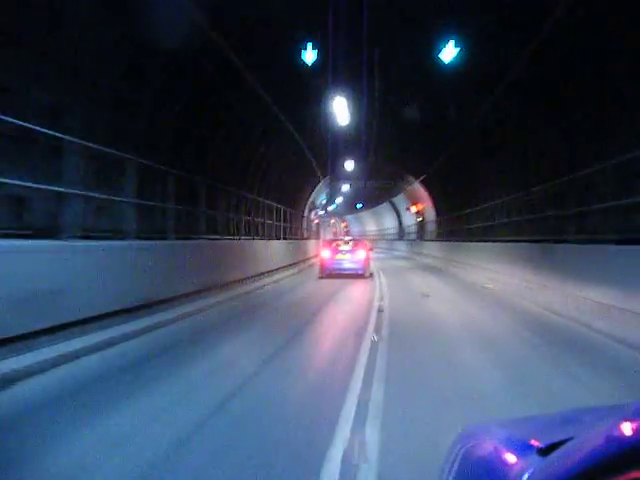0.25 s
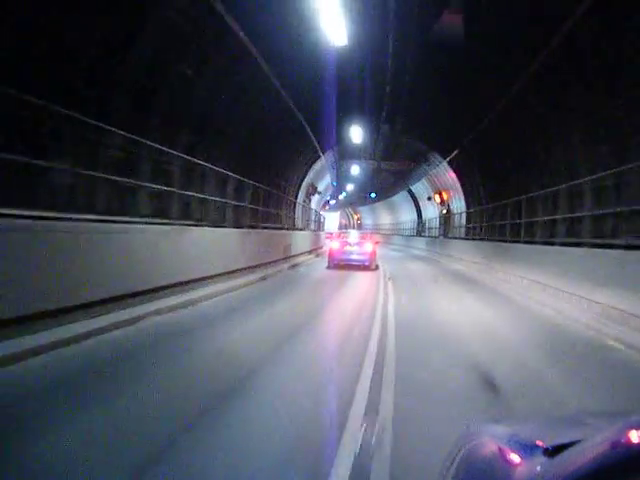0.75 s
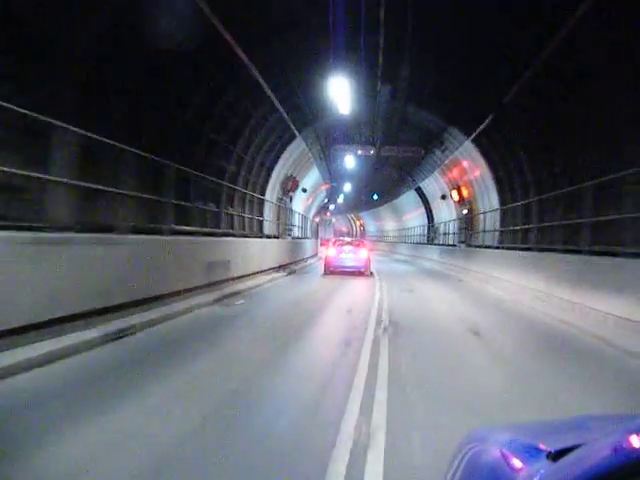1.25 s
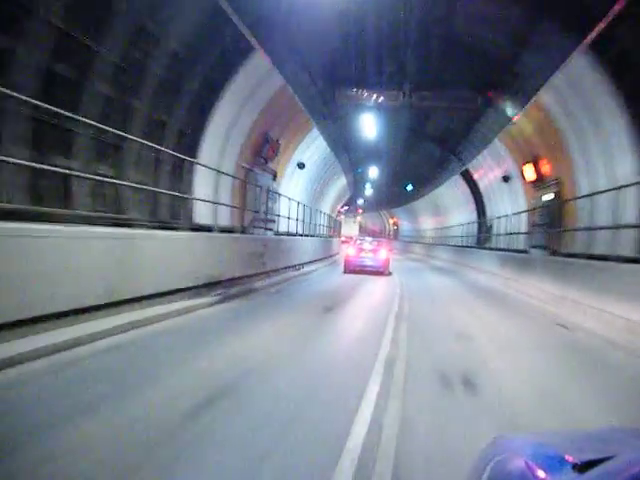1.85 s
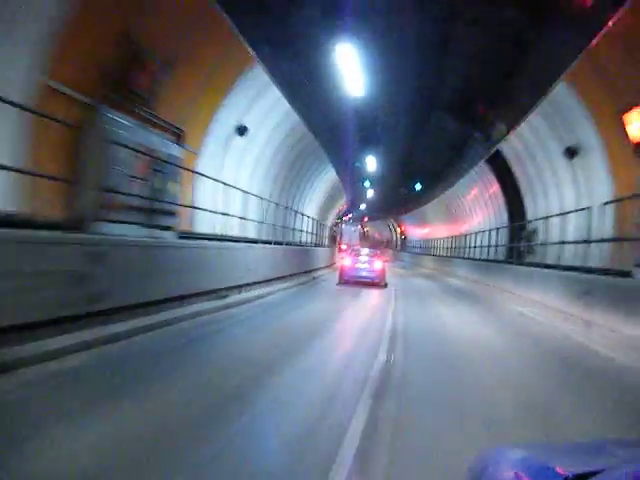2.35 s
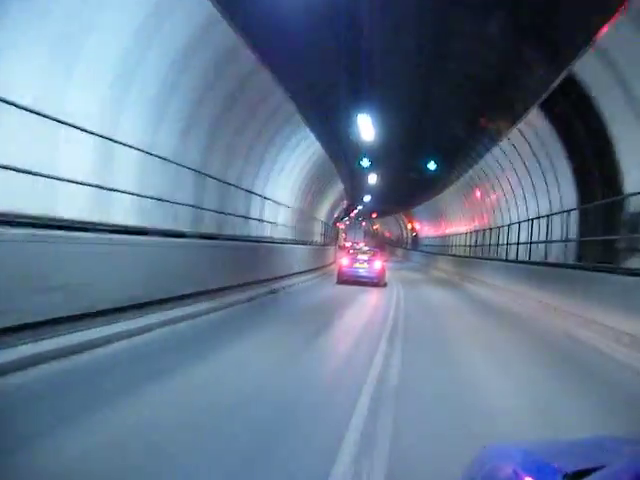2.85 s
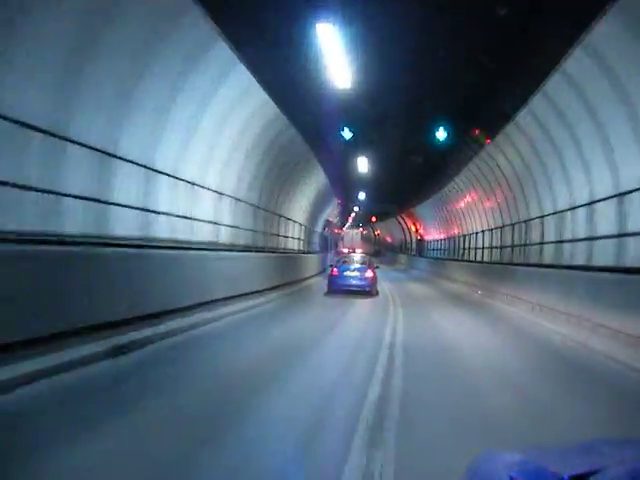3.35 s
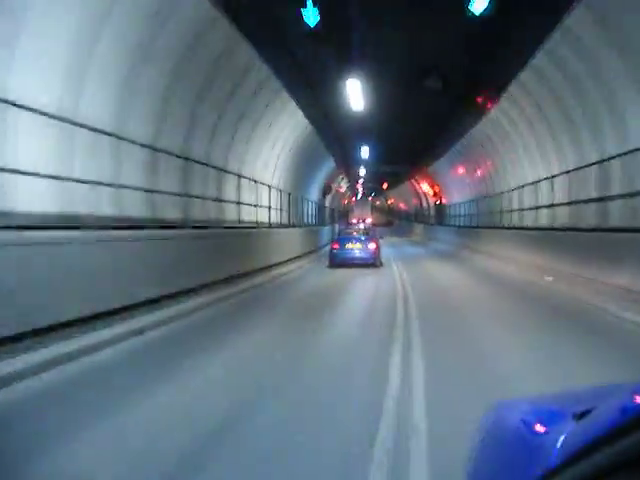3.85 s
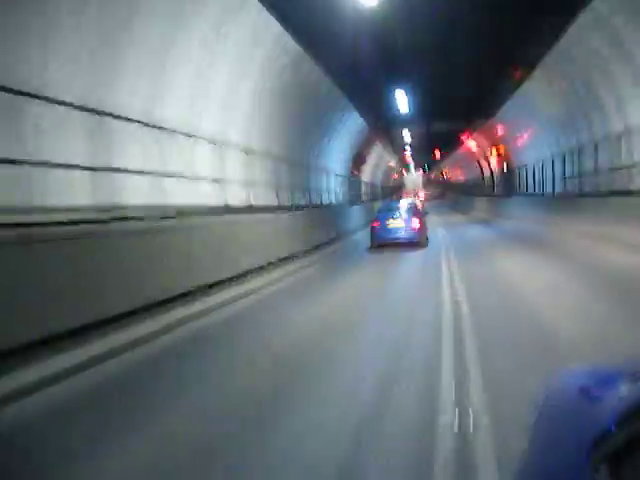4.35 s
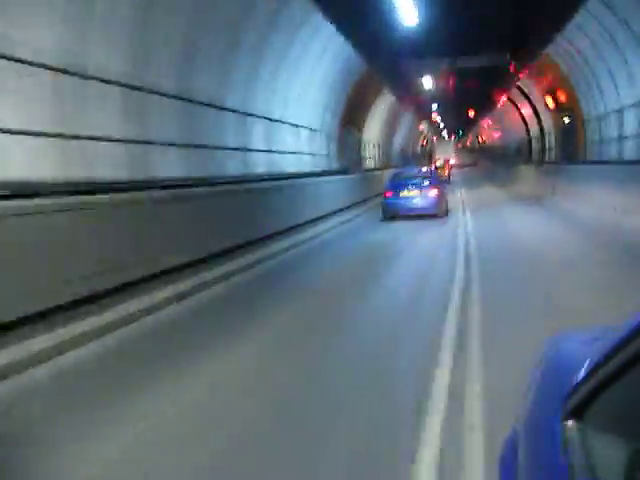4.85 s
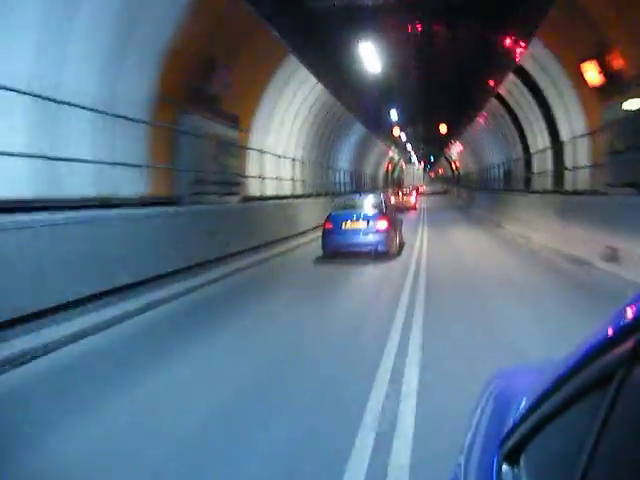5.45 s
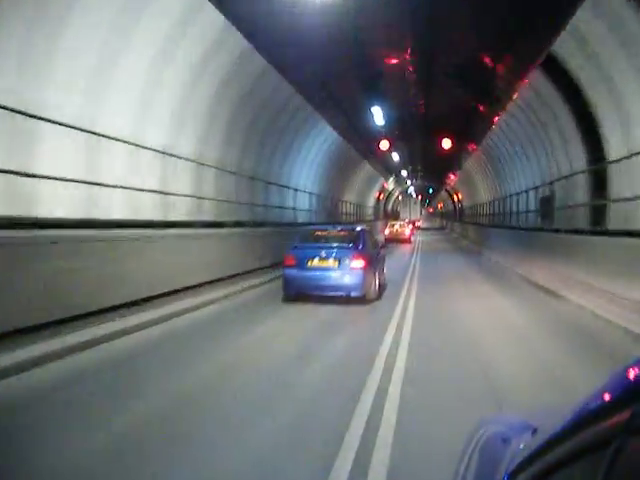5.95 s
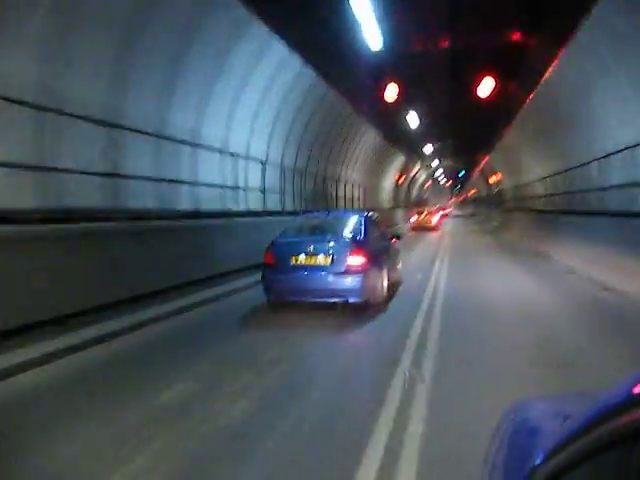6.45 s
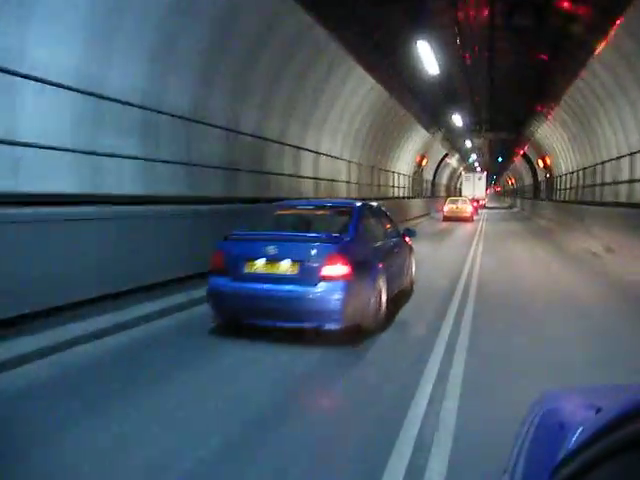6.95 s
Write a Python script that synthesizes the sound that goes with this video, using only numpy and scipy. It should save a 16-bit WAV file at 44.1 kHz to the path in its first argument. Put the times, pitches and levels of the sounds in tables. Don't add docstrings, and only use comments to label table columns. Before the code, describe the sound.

Wind thumps and crackles hard against a small microphone over the dull roar of tyres and a humming engine in a fast tunnel drive.

```python
import sys
import numpy as np
from scipy import signal
from scipy.fft import rfft, irfft, next_fast_len
from scipy.io import wavfile
from scipy.ndimage import uniform_filter1d

SR = 44100
rng = np.random.default_rng(int(sys.argv[2]) if len(sys.argv) > 2 else 0)


def magnitude_from_level(level_db):
    exponent = np.asarray(level_db, float) / 20
    return 10 ** exponent


def store_pcm(level_fs):
    pcm = np.round(np.clip(level_fs, -1, 1) * 32767).astype(np.int16)
    wavfile.write(sys.argv[1], SR, np.atleast_2d(pcm).T)


N = 318244

# (time [s], buffet level [dB], thump over buffet [dB])
WIND = [(0.0, -23.5, 11.5), (0.22, -20, 1), (0.34, -26, 9.5), (0.78, -15, 2.5), (1.41, -20, 3.5),
        (1.91, -14.5, -3.5), (2.03, -21.5, 4), (2.49, -19, -2.5), (3.13, -20, 7), (3.28, -18, -7.5),
        (3.39, -23.5, 1), (5.27, -14, 0), (5.37, -13.5, 0), (5.49, -17.5, 2), (5.71, -15, 0.5),
        (5.73, -20, 0), (7.18, -16.5, -0.5), (7.22, -27.5, 10)]
# (frequency [Hz], density [dB per Hz])
BUFFET_COLOUR = [(8, -32.5), (20, 4), (35, -2.5), (70, 0), (110, -16), (200, -31.5)]
# (frequency [Hz], density [dB per Hz])
THUMP_COLOUR = [(40, -31.5), (80, -2), (120, 2), (170, -7), (260, -11.5), (450, -23.5)]
# (time [s], crack level [dB], depth [dB])
SLAMS = [(0.196, -36, -4), (0.519, -52, -0.5), (0.8672, -42, -3), (0.8987, -46, 0.5), (1.0883, -41, -2),
         (1.1214, -44, -4.5), (1.4048, -38, -3), (1.7762, -51, -4), (2.0276, -45, -6.5), (2.396, -46, -5),
         (2.514, -46, -2.5), (2.6419, -33, -4.5), (2.754, -35, 0.5), (2.9513, -47, -4), (3.0742, -49, -3),
         (3.092, -26.5, 1), (3.3263, -38.5, -3), (3.9114, -41, -9), (4.4156, -40, -1.5), (4.5159, -40, -4),
         (4.7436, -51, -2.5), (4.7734, -37, -2.5), (4.812, -36, -3), (5.4985, -44, -6.5),
         (5.7743, -32, -3.5), (6.0126, -27, -6), (6.6135, -40, -6.5), (6.64, -41, -0.5), (6.9176, -42, -3),
         (7.108, -27.5, -2.5)]
# (time
# [s], crack level [dB])
MORE_SLAMS = [(0.0521, -47), (0.0845, -48), (0.1205, -42.5), (0.1503, -45.5), (0.2549, -46), (0.4869, -49),
              (0.5997, -47.5), (0.84, -43), (1.037, -48.5), (1.2251, -47.5), (1.6764, -48), (1.9001, -57.5),
              (1.9546, -47.5), (2.0799, -40), (2.0986, -47), (2.1677, -46), (2.1805, -48), (2.5316, -38),
              (2.837, -47.5), (2.8862, -51.5), (3.1112, -44), (3.3492, -39), (3.4394, -42.5), (3.4653, -44),
              (3.4966, -43.5), (4.2609, -42), (4.3708, -42.5), (4.677, -44), (5.9681, -44.5), (6.3062, -52)]
# (time [s], change [dB], half length [s])
GUSTS = [(0.036, 2.5, 0.022), (0.993, 4, 0.06), (1.062, -9.5, 0.013), (1.179, -13, 0.0091),
         (1.337, -5, 0.0068), (2.107, 3.5, 0.037), (2.276, 0.5, 0.036), (2.46, -5, 0.012),
         (2.516, 3.5, 0.0088), (2.887, -2.5, 0.054), (3.09, 2.5, 0.072), (4.63, 3, .1), (4.999, 7.5, .008),
         (5.028, -4, 0.01), (5.203, -4, 0.029), (5.466, -5.5, .06), (5.626, -10, 0.018),
         (5.722, -6.5, 0.022), (5.803, -6, 0.025), (5.861, 5, 0.0053), (5.93, -5.5, 0.028),
         (5.963, 6, .012), (6, -26, .01), (6.003, 16, 0.014), (6.046, -15, 0.0061), (6.128, 3.5, 0.049),
         (6.43, -4, .012), (6.491, 3, 0.015), (6.499, -12, 0.0068), (6.889, -5, 0.036)]
# (frequency [Hz], density [dB per Hz])
WHIRL_COLOUR = [(300, -11.5), (700, -1.5), (1200, 4), (2000, -1.5), (3000, -8), (4200, -14), (5400, -19.5),
                (5950, -37.5)]
# (time [s], roar level [dB])
TUNNEL = [(0, -18.5), (.5, -18.5), (.8, -20.5), (1.3, -20), (2.0, -20), (2.5, -18), (3.2, -20.5),
          (3.6, -18.5), (4.75, -19.5), (4.95, -22.5), (5.6, -23.5), (6.1, -24.5), (6.7, -21.5), (7.22, -25)]
# (frequency [Hz], density [dB per Hz])
ROAR_COLOUR = [(88, -26), (150, -8), (224, -1.5), (355, 1), (405, -4.5), (492, -2), (691, -6.5),
               (838, -7.5), (1350, -18.5), (2170, -28), (5200, -62), (6760, -58), (11400, -120)]
# (time [s], level [dB], rise [s], fade [dB per s])
BAYS = [(0, -33, .01, 42), (.13, -31, 0.035, 26.5), (0.899, -43.5, 0.089, 59), (1.75, -41, .2, 30.5),
        (2.085, -25, 0.0065, 41), (2.739, -29, 0.11, 48), (3.254, -27.5, .01, 14.5),
        (3.67, -35.5, .04, 20.5), (4.55, -32, 0.38, 20), (5.1, -46.5, .1, 30), (6.4, -54.5, 0.13, 39),
        (7.1, -51, 0.12, 10)]
# (frequency [Hz], density [dB per Hz])
TYRE_COLOUR = [(900, -11), (1500, 1), (2200, 3.5), (3200, -3.5), (4300, -8), (5300, -12.5), (5900, -25.5)]
# (time [s], firing frequency [Hz], firing level [dB], octave over firing [dB])
ENGINE = [(0, 200, -18.5, -2.5), (.35, 200.1, -20, 2), (.6, 205, -13.5, -7), (1.0, 184.7, -16.5, -8),
          (1.17, 177.7, -17.5, -3.5), (1.3, 204, -15, -3.5), (1.9, 204.2, -15, -7),
          (2.2, 203.6, -31.5, 18.5), (2.45, 202.3, -21.5, 2), (2.9, 205.5, -17, -1.5),
          (3.18, 191, -15, -11.5), (3.3, 202.6, -21.5, 5.5), (3.9, 203.6, -13, -2.5),
          (4.25, 202.9, -28.5, 7.5), (4.5, 202.3, -16, -0.5), (4.85, 202.2, -27.5, 1),
          (6.25, 202.2, -26, 2.5), (7.22, 200.8, -28, -6.5)]
# (multiple of firing [ratio], level against the octave [dB])
SIDE_TONES = [(1.5, -7), (2.1, -3), (2.7, -12)]
# (time [s], multiple of firing [ratio], level [dB], half length [s])
BOOMS = [
    (0.708, 1.25, -19, .08),
    (1.498, 1.5, -18, 0.23),
    (2.508, 1.25, -23, 0.11),
    (3.249, 2.1, -13.5, .04),
    (3.8, 1.25, -18.5, 0.09),
    (1.998, 1.04, -13.5, 0.065),
    (5.35, .72, -17, 0.22),
    (6.301, 1.55, -20.5, 0.14),
]

STOP = .704
SLAM_LAG_S = .0012


def evened(x):
    return x / np.sqrt(np.mean(x ** 2) + 1e-20)


def curve(table, column):
    rows = np.array(table)
    return np.interp(np.arange(N) / SR, rows[:, 0], rows[:, column])


def noise(colour):
    hz, db = np.transpose(colour)
    size = next_fast_len(N, True)
    bins_hz = np.fft.rfftfreq(size, 1 / SR)
    gain = magnitude_from_level(np.interp(np.log(bins_hz + 1), np.log(hz + 1), db, -90, -90))
    return evened(irfft(rfft(rng.standard_normal(size)) * gain, size)[:N])


def flicker(low_hz, top_hz):
    return noise([(low_hz / 2, -20), (low_hz, 0), (top_hz, -9), (2 * top_hz, -30)])


def steadied(x, span_s):
    return x / np.sqrt(uniform_filter1d(x ** 2, int(span_s * SR)) + 0.047)


def wind():
    buffet_db = curve(WIND, 1) - 0.5 + 2.0 * flicker(1.5, 17)
    buffets = magnitude_from_level(buffet_db) * steadied(noise(BUFFET_COLOUR), 0.095)
    thump_db = curve(WIND, 1) + curve(WIND, 2) - 1.5 + 1.8 * flicker(3, 14)
    thumps = magnitude_from_level(thump_db) * steadied(noise(THUMP_COLOUR), 0.035)
    return buffets + thumps


def slams(air):
    t, pull, depth = np.arange(N) / SR, np.zeros(N), np.zeros(N)
    common_depth_db = -3
    for s, crack_db, depth_db in SLAMS + [(s, db, common_depth_db) for s, db in MORE_SLAMS]:
        near = slice(max(round(s * SR) - 150, 0), round(s * SR) + 250)
        width_ms = np.clip(.55 - .012 * (crack_db + 46), .3, 1.2)
        shape = np.exp(-((t[near] - s - SLAM_LAG_S) * 1000 / width_ms) ** 2)
        pull[near] = np.maximum(pull[near], shape)
        depth[near] += shape * magnitude_from_level(depth_db + 4.0)
    return air * (1 - pull) - depth


def cracks():
    rows = np.array([row[:2] for row in SLAMS + MORE_SLAMS])
    strikes = np.zeros(N)
    strikes[np.round((rows[:, 0] + SLAM_LAG_S) * SR).astype(int)] = magnitude_from_level(rows[:, 1] + 10.0)
    click_hz = [0, 1500, 3000, 8000, 14500, 16000, SR / 2]
    click = signal.firwin2(41, click_hz, [0, 0, 1.3, 1, .4, 0, 0], fs=SR)
    return -signal.oaconvolve(strikes, click, "same")


def dip(width_s):
    u = np.arange(-4, 10, 1 / (width_s * SR))
    return -np.exp(-u ** 2) + 0.48 * np.exp(-((u - 2.5) / 2) ** 2)


def gusts_db():
    t, out = np.arange(N) / SR, np.zeros(N)
    for s, db, half_s in GUSTS:
        out += db * np.exp(-((t - s) / half_s) ** 2)
    return out


def eddies(per_s=450, spread_db=4.0):
    gust_db = 2.3 * flicker(7.6, 110)
    size_db = spread_db * np.minimum(rng.exponential(1, N), 4.5) + gust_db
    size = magnitude_from_level(size_db) * (rng.random(N) < per_s / SR)
    kind = rng.integers(0, 4, N)
    ticks = np.zeros(N)
    for k, width_ms in enumerate([.13, .27, .42, .75]):
        ticks += width_ms * signal.oaconvolve(size * (kind == k), dip(width_ms / 1000))[:N]
    hiss = magnitude_from_level(gust_db + 4.5 * flicker(40, 500)) * noise(WHIRL_COLOUR)
    level_db = -28.5 + np.arange(N) / N + gusts_db()
    return magnitude_from_level(level_db) * (magnitude_from_level(10.5) * evened(ticks) + magnitude_from_level(-3.0) * evened(hiss))


def bays():
    t, power = np.arange(N) / SR, np.zeros(N)
    for s, db, rise_s, fade in BAYS:
        loss_db = np.where(t < s, 20 * ((s - t) / rise_s), fade * (t - s))
        power += magnitude_from_level(2 * (db - loss_db))
    return np.sqrt(power)


def roar():
    low_db = curve(TUNNEL, 1) + 3.5 + 0.37 * gusts_db() + 1.5 * flicker(6, 71)
    low = magnitude_from_level(low_db) * noise(ROAR_COLOUR)
    return low + magnitude_from_level(-1.5) * bays() * noise(TYRE_COLOUR)


def engine(blur_hz=6):
    t, out = np.arange(N) / SR, np.zeros(N)
    firing_db = curve(ENGINE, 2)
    octave_db = firing_db + curve(ENGINE, 3)
    tones = [(1, firing_db), (5 / 4, firing_db - 10.5), (2, octave_db - 2.5)]
    tones += [(k, octave_db + db) for k, db in SIDE_TONES]
    tones += [(k, db - 6 * ((t - s) / half_s) ** 2) for s, k, db, half_s in BOOMS]
    for k, db in tones:
        wander_hz = blur_hz * (flicker(2, 19.7) + (k - 1) * flicker(.8, 3))
        hz = k * curve(ENGINE, 1) + wander_hz
        level = np.sqrt(2) * magnitude_from_level(db - 4.0 + 2.5 * flicker(2.8, 45))
        out += level * np.sin(2 * np.pi * np.cumsum(hz) / SR)
    return out


def scene():
    return slams(wind() + eddies() + roar() + engine())[None]


def low_pass(x):
    return signal.sosfilt(signal.butter(12, 15850, fs=SR, output="sos"), x)


def record(dry):
    rest, lopside = .011, .25
    bent = dry + rest - lopside * (dry ** 2 - uniform_filter1d(dry ** 2, 2000))
    knee, headroom = 24, 1.008
    flat = bent / (1 + abs(bent / (headroom * STOP)) ** knee) ** (1 / knee)
    treble_cut = signal.firwin(101, 5820, window=("kaiser", 8), fs=SR)
    narrow = signal.oaconvolve(flat, treble_cut[None], "same")
    stopped = np.clip(narrow, -STOP, STOP) + cracks()
    mirrored = stopped * (1 + magnitude_from_level(-85) * np.cos(np.pi * np.arange(N) / 2))
    dulled = signal.lfilter(*signal.butter(2, 14000, fs=SR), mirrored)
    return low_pass(dulled)


dry = scene()
out = record(dry)
store_pcm(out)
```